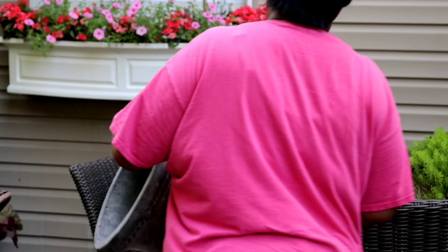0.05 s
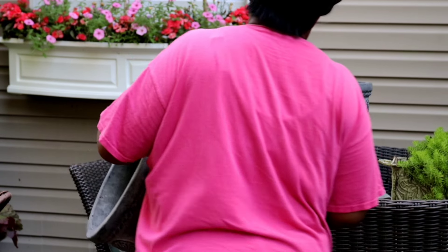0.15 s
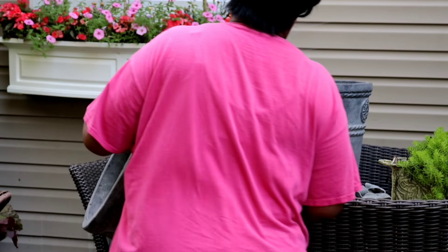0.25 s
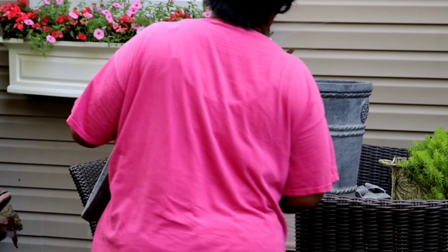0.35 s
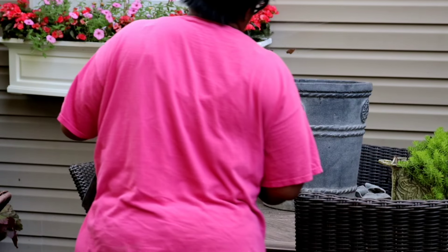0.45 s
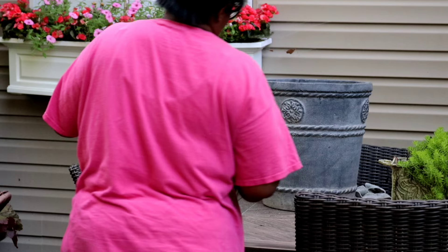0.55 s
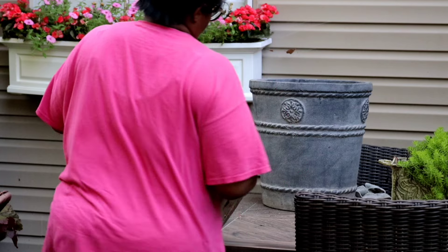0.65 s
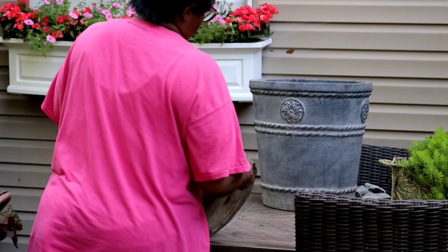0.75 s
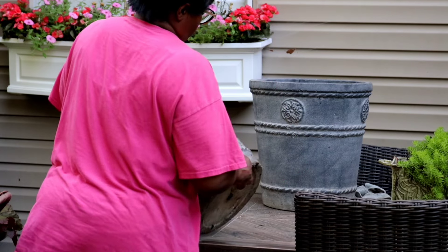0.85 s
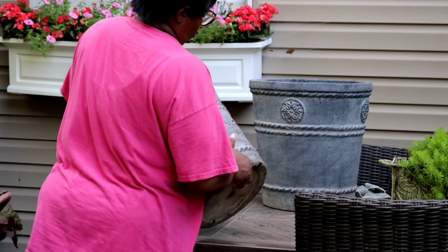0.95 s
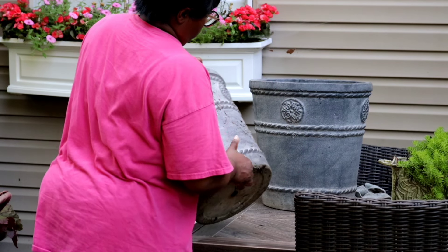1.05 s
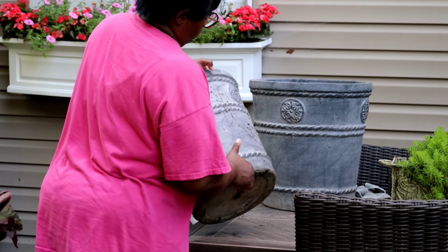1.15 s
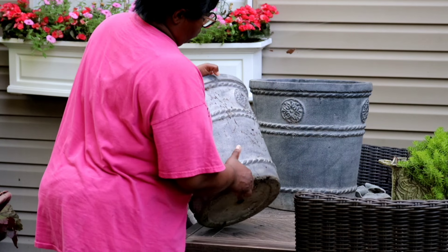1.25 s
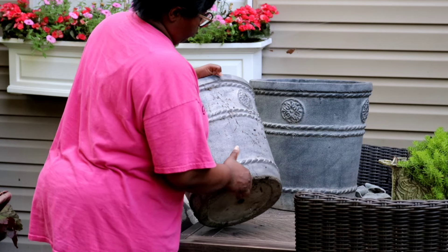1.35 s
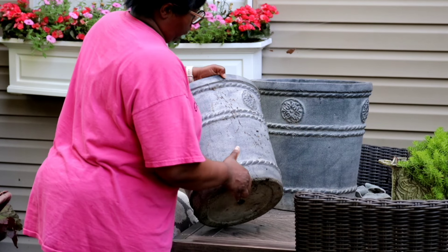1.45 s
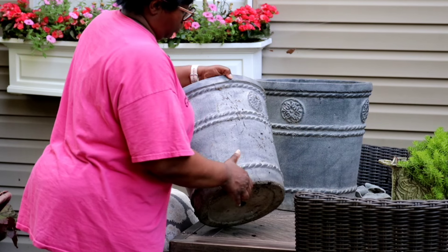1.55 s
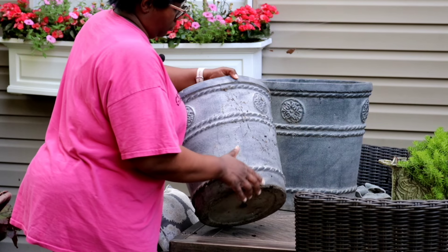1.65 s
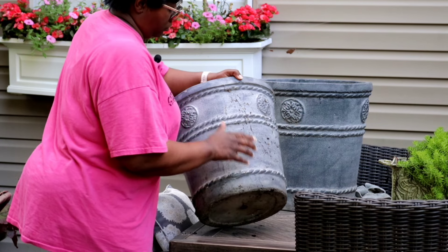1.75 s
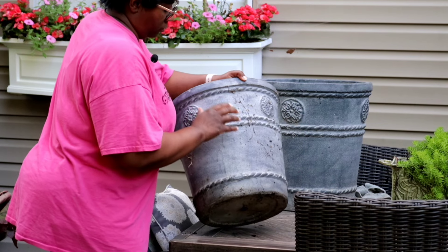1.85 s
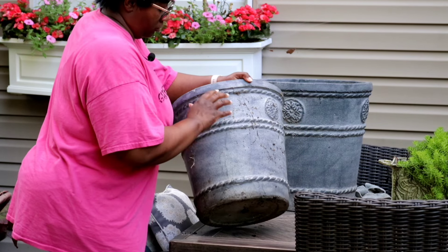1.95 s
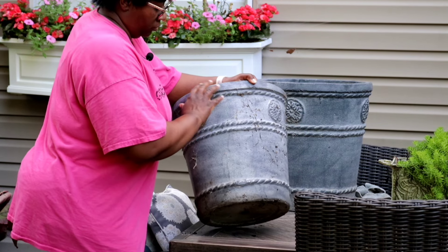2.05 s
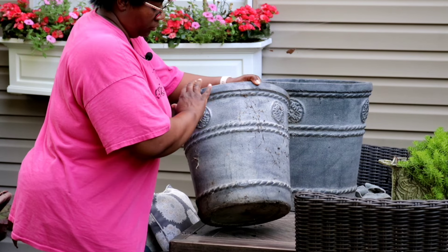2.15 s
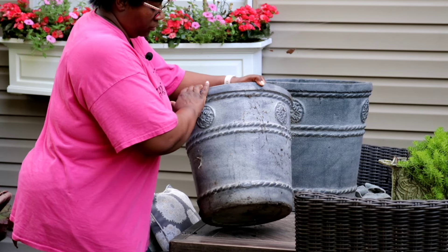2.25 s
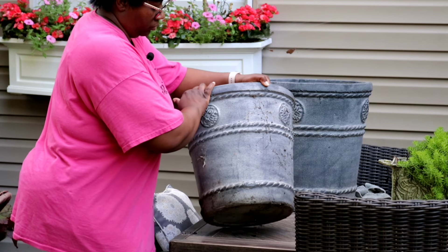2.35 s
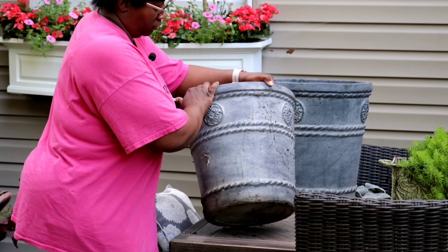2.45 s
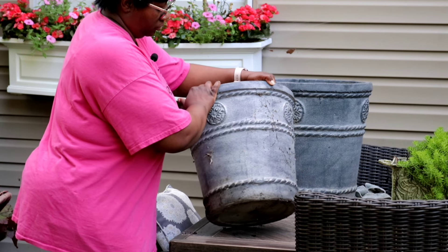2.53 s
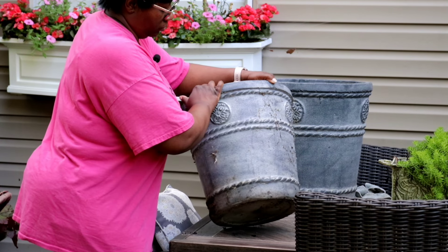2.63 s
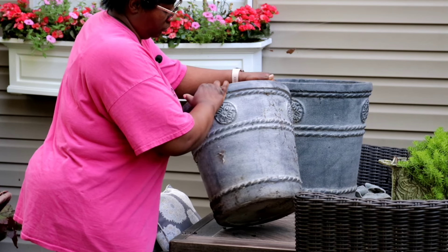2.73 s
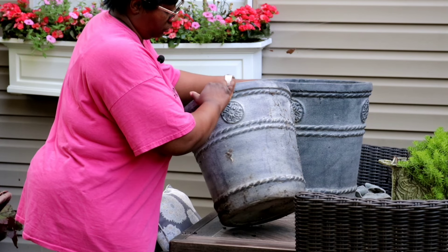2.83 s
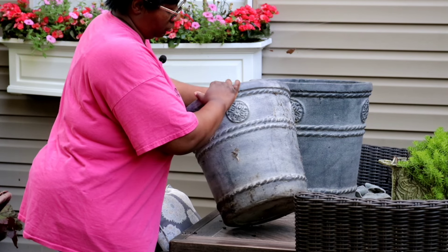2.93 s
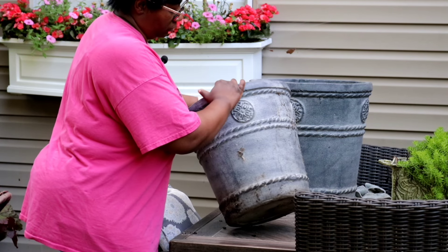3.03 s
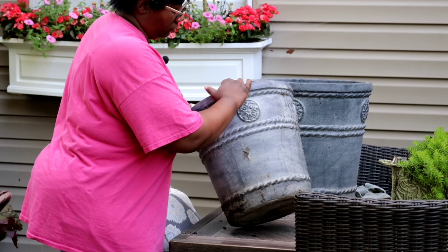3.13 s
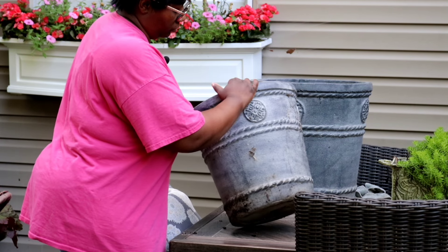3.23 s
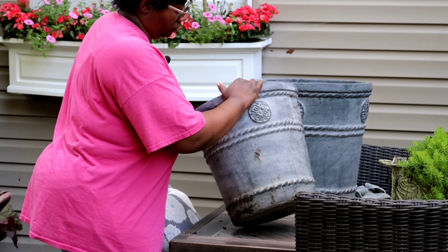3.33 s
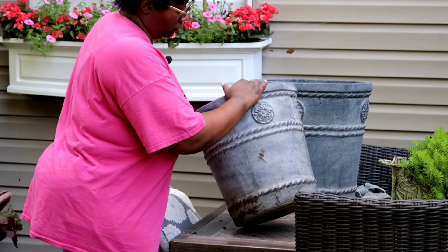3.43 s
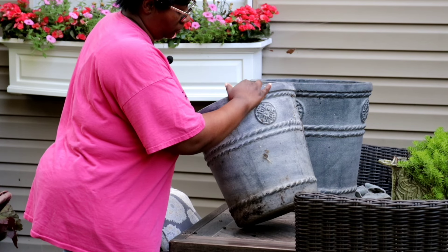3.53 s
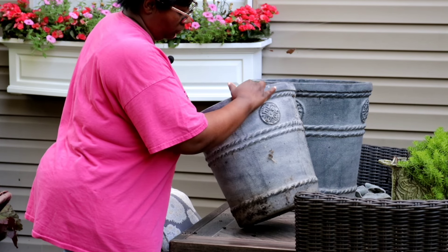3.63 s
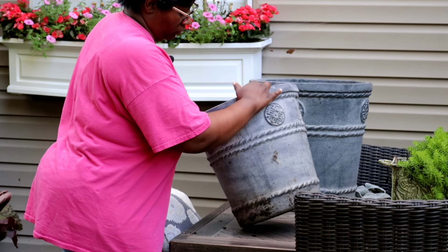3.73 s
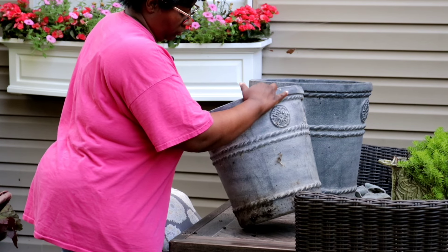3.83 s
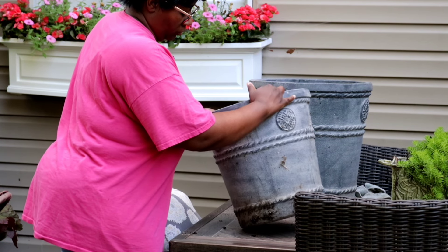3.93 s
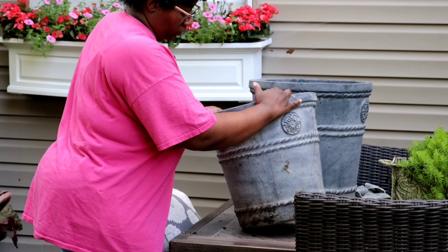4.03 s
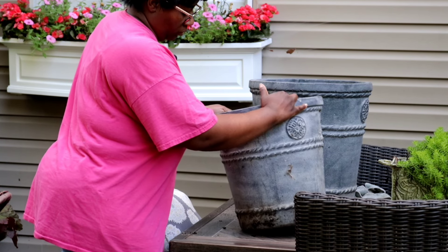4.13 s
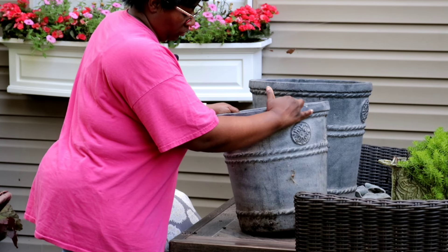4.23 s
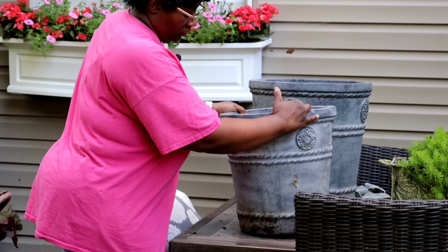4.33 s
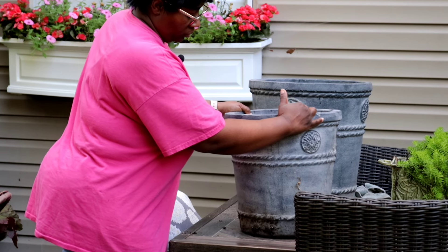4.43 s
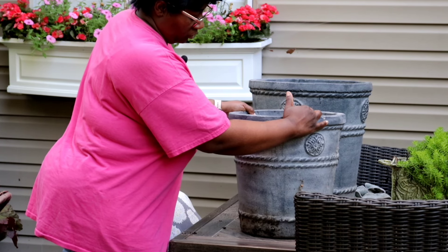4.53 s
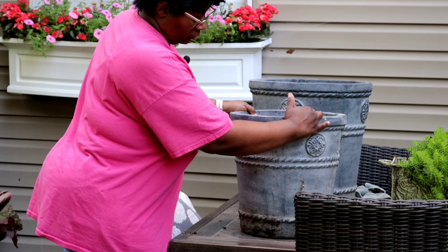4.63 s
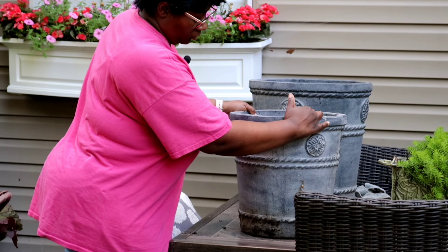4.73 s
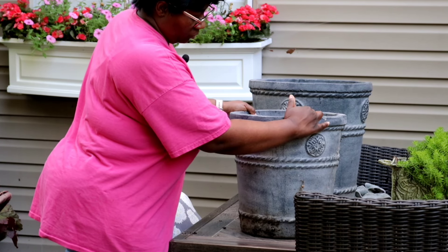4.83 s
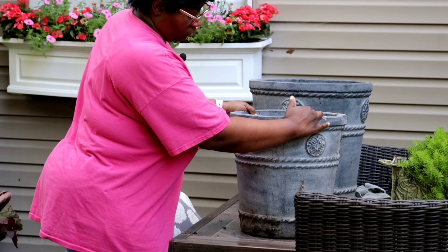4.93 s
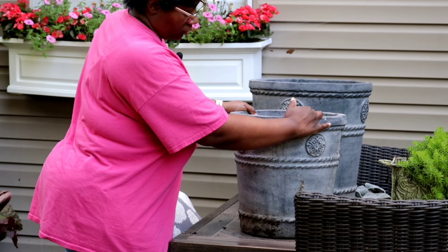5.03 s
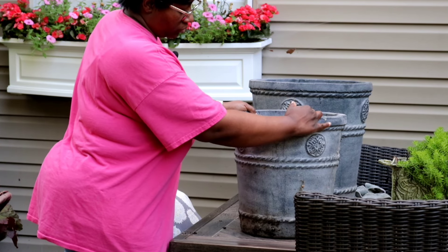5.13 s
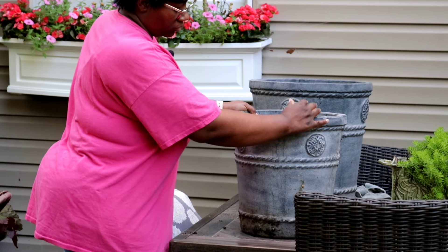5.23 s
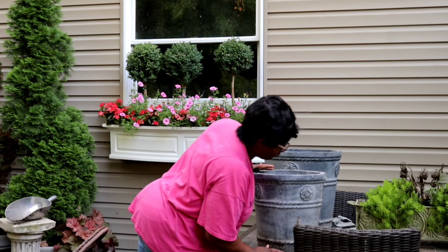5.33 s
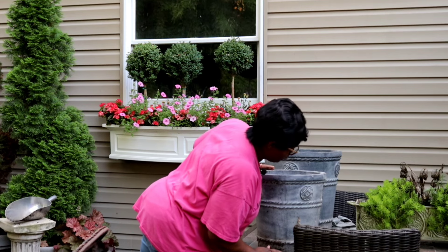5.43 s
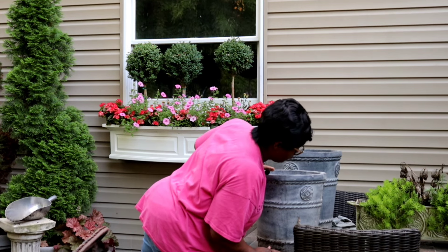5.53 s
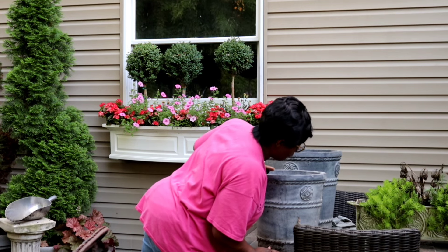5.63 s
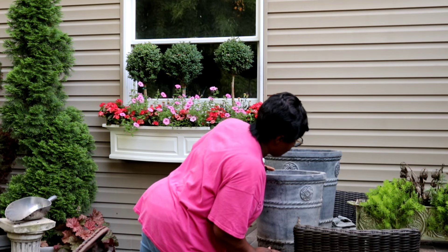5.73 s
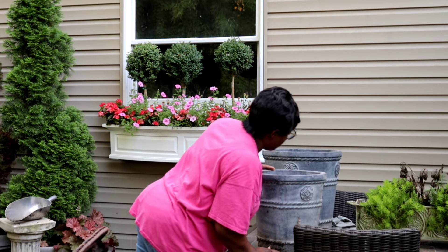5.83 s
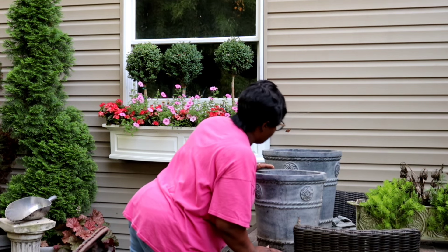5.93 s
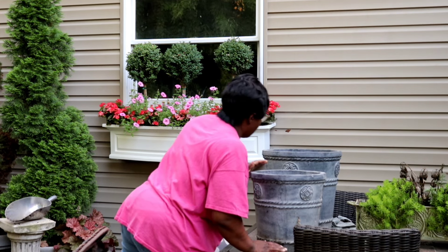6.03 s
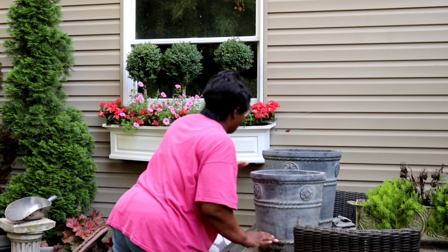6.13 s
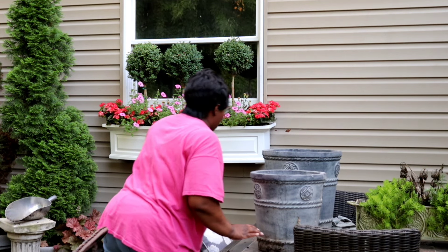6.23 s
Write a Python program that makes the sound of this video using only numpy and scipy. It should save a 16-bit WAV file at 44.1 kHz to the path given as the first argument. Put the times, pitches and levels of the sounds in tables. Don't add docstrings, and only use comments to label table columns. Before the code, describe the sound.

Outdoors beside a house, a clothing microphone catches rustling cloth, a brushing bump and a heavy double landing of a hollow pot on wood slats. Distant traffic rises behind it, with high insects, soft dove coos and later tiny bird chirps. Small gritty cracks, dull bumps and scrapes lead to a loud knocking clatter as the pot settles. A faint hand slide and two small bumps end it.

```python
import sys
import numpy as np
from scipy import signal
from scipy.fft import rfft, irfft, next_fast_len
from scipy.io import wavfile
from scipy.ndimage import uniform_filter1d, map_coordinates

SR = 44100
rng = np.random.default_rng(int(sys.argv[2]) if len(sys.argv) > 2 else 0)


def invert_db(x):
    u = np.asarray(x, float) / 20
    return 10 ** u


def pcm_store(signal):
    levels = np.round(np.clip(np.atleast_2d(signal), -1, 1) * 32767)
    wavfile.write(sys.argv[1], SR, levels.astype(np.int16).T)


N = 276982
TIME = np.arange(N) / SR

OPEN_S, OPEN_TAKES_S, CLAMP_S, CLAMP_TAKES_S = 1.48, 0.066, 5.46, 0.096


def unit(x):
    return x / np.sqrt(np.mean(x ** 2) + 1e-20)


def curves(rows):
    s, *columns = np.transpose(rows)
    return [np.interp(TIME, s, column) for column in columns]


def wobble(rate):
    knots = rng.standard_normal(int(N * rate / SR) + 4)
    return map_coordinates(knots, [TIME * rate])


def filtered(x, response):
    m = next_fast_len(len(x) + SR // 2)
    return irfft(rfft(x, m) * response(np.fft.rfftfreq(m, 1 / SR)), m)[:len(x)]


def resonant(x, modes):
    def response(f):
        total = 0
        for k, (centre, width, db) in enumerate(modes):
            damping = 1j * f * width
            total = total + (-1) ** k * invert_db(db) * damping / (centre * centre - f * f + damping)
        return total
    return filtered(x, response)


def rush(spectrum, patchy_db):
    z = signal.stft(rng.standard_normal(N + 512), nperseg=512)[2]
    field = uniform_filter1d(rng.standard_normal(z.shape), 6, 0)
    field = uniform_filter1d(field, 8, 1)
    noise = signal.istft(z * invert_db(patchy_db * unit(field)), nperseg=512)[1][:N]
    f, db = np.transpose(spectrum)
    return unit(filtered(noise, lambda hz: invert_db(np.interp(np.log(hz + 1), np.log(f + 1), db))))


def fading(start, t60, rise):
    t = np.maximum(TIME - start, 0)
    return (1 - np.exp(-t / rise)) * invert_db(-60 * t / t60)


def held(start, hold, rise, t60):
    return fading(start, 1e3, rise) * invert_db(-60 * np.maximum(TIME - start - hold, 0) / t60)


def gated(muted_db, open_db, clamped_db):
    corners = [OPEN_S, OPEN_S + OPEN_TAKES_S, CLAMP_S, CLAMP_S + CLAMP_TAKES_S]
    return np.interp(TIME, corners, [muted_db, open_db, open_db, clamped_db])


# frequency in Hz, density in dB per Hz.
RUMBLE_SPECTRUM = [(12, -49.5), (20, 7), (75, -3), (118, 4.5), (206, -5), (236, -15.5), (300, -13),
                   (390, -47.5), (660, -120)]
HUM_SPECTRUM = [(120, -30.5), (200, -7.5), (237, -8.5), (367, -1.5), (501, -5.5), (936, -7), (1500, -24.5),
                (1950, -55), (3300, -120)]
AIR_SPECTRUM = [(710, -39), (1200, -3.5), (1520, -6.5), (1720, -8), (2570, -11.5), (4200, -23.5),
                (5460, -53), (9240, -120)]
# time in seconds, level in dB.
TRAFFIC_SWELL = [(0, 0.5), (.77, -0.5), (1.21, 11.5), (1.45, 3.5), (1.6, 1), (1.99, 2), (2.4, 0.5),
                 (2.76, 0), (3.11, 1.5), (3.55, -1.5), (4.06, 1), (4.56, 0), (4.95, -2.5), (5.35, 0),
                 (5.6, -1), (6.28, -2)]
# start in seconds, extra level in dB.
FILTER_LEAKS = [
    (1.53, 6.3),
    (4.72, 24),
]


def yard():
    swell_db = curves(TRAFFIC_SWELL)[0]
    swell_db = swell_db + sum(db * fading(s, t60=0.34, rise=.01) for s, db in FILTER_LEAKS)
    rumble_db = gated(-74.5, -47.5, -60) + .9 * swell_db + 1.2 * wobble(12.0)
    hum_db = gated(-77, -49.5, -61.5) + swell_db
    air_db = gated(-80, -59.5, -75.5) + 0.54 * swell_db
    return (invert_db(rumble_db) * rush(RUMBLE_SPECTRUM, patchy_db=-0.5)
            + invert_db(hum_db) * rush(HUM_SPECTRUM, patchy_db=0.5)
            + invert_db(air_db) * rush(AIR_SPECTRUM, patchy_db=2.0))


# time in seconds, level in dB.
CHORUS_LEVEL = [(0, -49), (.37, -47), (.68, -51), (.86, -35), (1.05, -46.5), (1.4, -44), (1.57, -59),
                (2.15, -57), (3.17, -59.5), (4.5, -60), (4.67, -57), (4.98, -60.5), (5.25, -56.5),
                (5.49, -61.5), (5.6, -75.5), (6.28, -76)]


def insects():
    high_db = curves(CHORUS_LEVEL)[0]
    low_db = high_db + gated(-12.5, -9.5, -8) + 1.6 * wobble(4)
    out = 0
    # level, centre in Hz, width in Hz, strokes a second
    for db, hz, width, rate in [(high_db, 8400, 340, 59), (low_db, 7230, 280, 80)]:
        strokes = np.sin(2 * np.pi * rate * TIME + 1.0 * wobble(3.8))
        throb = invert_db(1.7 * strokes + 1.4 * wobble(24.97))
        band = resonant(rng.standard_normal(N), [(hz, width, 0)])
        out = out + invert_db(db) * unit(throb * resonant(band, [(hz, width, 0)]))
    return out


def coo(s, length, hz, db):
    scoop, sag, rise_s = .04, 0.0317, .03
    u = np.clip((TIME - s) / length, 0, 1)
    pitch = hz * (1 - scoop * np.exp(-u * length / rise_s) - sag * u ** 2)
    edge = np.clip(np.minimum(u, 1 - u) * length / rise_s, 0, 1)
    level_db = db + 1.0 - 2.2 * u + 0.59 * wobble(30.2)
    return edge * invert_db(level_db) * np.sin(2 * np.pi * np.cumsum(pitch) / SR)


# start in seconds, length in seconds, top pitch in Hz, level in dB.
DOVE_COOS = [
    (.7, .1, 508, -71),
    (1.81, .28, 524, -45.5),
    (2.63, .39, 517, -49),
]
# centre in seconds, level in dB.
BIRD_CHIRPS = [
    (4.02, -55.5),
    (4.11, -54.5),
    (4.2, -56),
]


def birds():
    out = sum(coo(*row) for row in DOVE_COOS)
    for s, db in BIRD_CHIRPS:
        t = TIME - s
        phase = 2 * np.pi * (2280 * t - 600 * t ** 2) + 1.2 * wobble(250)
        out += invert_db(db) * np.exp(-(t / 0.013) ** 2) * (np.sin(phase) + 0.6 * np.sin(2 * phase))
    return out


# frequency in Hz, density in dB per Hz.
COARSE_RUB = [(1500, -120), (2200, -19), (3200, -17.5), (4300, -5), (5000, -1.5), (6000, -2), (7000, -3),
              (8000, -120)]
MIDDLE_RUB = [(4500, -120), (5500, -16), (7000, 0.5), (8000, 3.5), (9500, -2), (11000, -12), (13000, -34),
              (14000, -120)]
FINE_RUB = [(8000, -120), (9000, -15.5), (10500, 2), (11800, 1), (13000, -2.5), (14500, -11), (15600, -22),
            (15800, -120)]
WEAVE_RUB = [(3000, -120), (3500, -11.5), (4300, -1.5), (5000, 1.5), (5500, -2.5), (6200, -7), (8000, -120)]
# start in seconds, hold in seconds, level in dB, fine over coarse in dB.
SHIRT_SWISHES = [
    (.005, 0.0087, -61, 0),
    (.18, .02, -63, 11),
    (0.28, 0.035, -55, 4.5),
    (0.49, 0.024, -62, -6),
    (0.643, 0.014, -51, 3),
    (.715, .03, -62.5, -4),
    (.775, .03, -67.5, 7),
    (0.965, 0.049, -52.5, 3),
    (1.082, 0.055, -53.5, 7),
    (1.27, 0.045, -57, 3),
]
# start in seconds, hold in seconds, level in dB, fine over coarse in dB.
SLEEVE_FIDGETS = [
    (1.7, 0.54, -66, -14),
    (2.38, .06, -72, 8),
    (3.35, 0.14, -66, -4.5),
    (3.9, 0.8, -72, -21),
]


def cloth():
    rise_s, swish_t60, lean_s = 0.0073, .25, .86
    flurry = invert_db(0.45 * wobble(40) + 1.5 * wobble(300))
    leaning = (TIME > lean_s) & (TIME < OPEN_S)
    swish, silky = sum(invert_db([[db], [db + fine_db]]) * held(s, hold, rise_s, swish_t60)
                       for s, hold, db, fine_db in SHIRT_SWISHES)
    fidget, sheen = sum(invert_db([[db], [db + fine_db]]) * held(s, hold, rise=.05, t60=.6)
                        for s, hold, db, fine_db in SLEEVE_FIDGETS)
    settling = invert_db(-46) * held(lean_s, 0.072, rise_s, swish_t60)
    coarse = np.hypot(invert_db(gated(-62.5, -70.5, -91) + 0.5 * leaning), swish + fidget)
    middle = np.hypot(invert_db(gated(-51, -65, -85.5)), invert_db(4.5) * swish * ~leaning + settling)
    fine = np.hypot(invert_db(gated(-61, -74, -94) - 18 * leaning), silky + sheen)
    sleeve = np.exp(-((TIME - 2.89) / .055) ** 2)
    landed = TIME >= OPEN_S + OPEN_TAKES_S
    tone = np.where(landed, rush(WEAVE_RUB, patchy_db=1.5), rush(COARSE_RUB, patchy_db=-0.5))
    return flurry * ((coarse + invert_db(-58.5) * sleeve) * tone
                     + middle * rush(MIDDLE_RUB, patchy_db=-1.5)
                     + (fine + invert_db(-59.5) * sleeve) * rush(FINE_RUB, patchy_db=0))


# frequency in Hz, density in dB per Hz.
DULL_BRUSH = [(700, -120), (1000, -17), (2000, -7.5), (3500, -1.5), (4500, -120)]
SHARP_BRUSH = [(2800, -120), (3500, -1.5), (5500, 1), (7500, 4), (10000, -8), (13000, -16), (15800, -41)]
# start in seconds, dull level in dB, dull t60 in seconds,
# sharp level in dB, sharp t60 in seconds, plateau in seconds.
SHIRT_BRUSHES = [
    (0.8258, -41, 0.11, -30, 0.14, 0.0094),
    (1.408, -33, 0.14, -23, 0.12, 0.017),
    (1.504, -45.5, 0.22, -63, 0.1, 0.011),
]


def brushes():
    dull, sharp = rush(DULL_BRUSH, patchy_db=-1.0), rush(SHARP_BRUSH, patchy_db=3)
    out = 0
    for s, dull_db, dull_t60, sharp_db, sharp_t60, plateau in SHIRT_BRUSHES:
        out = out + invert_db(dull_db) * held(s, plateau, .003, dull_t60) * dull
        out = out + invert_db(sharp_db) * held(s, plateau, .003, sharp_t60) * sharp
    return out


# frequency in Hz, density in dB per Hz.
PALM_SPECTRUM = [(700, -120), (1000, 0.5), (1800, 5.5), (2100, -3), (3000, -14), (3800, -7), (5000, -15),
                 (6000, -120)]


def slide():
    return invert_db(-65.5) * held(5.76, hold=0.4, rise=0.051, t60=1.0) * rush(PALM_SPECTRUM, patchy_db=1.5)


def pat():
    start, length_s, hz = 3.616, .03, 203
    swell = np.sin(np.pi * np.clip((TIME - start) / length_s, 0, 1)) ** 0.85
    return invert_db(-27.5) * swell * np.sin(2 * np.pi * hz * (TIME - start))


# frequency in Hz, width in Hz, level in dB.
FOOT_MODES = [(1220, 60, -4), (2230, 90, -4), (2820, 130, 0), (3560, 80, -6), (3780, 120, -1)]
# frequency in Hz, density in dB per Hz.
SNAP_SPECTRUM = [(1000, -17.5), (2500, -1.5), (5000, -1.5), (8000, -3.5), (12000, -3), (16000, -22)]
# start in seconds, hold in seconds, level in dB.
BASE_DRAGS = [
    (3.11, .028, -56),
    (3.171, .14, -53),
    (4.335, 0.093, -56),
    (4.586, 0.086, -46),
    (4.697, .03, -46),
]


def drags():
    stroke = sum(invert_db(db) * held(s, hold, rise=.003, t60=0.13) for s, hold, db in BASE_DRAGS)
    slips = stroke * unit(invert_db(2 * wobble(110) + 4 * wobble(700)))
    ringing = invert_db(12.5) * resonant(slips * rng.standard_normal(N), FOOT_MODES)
    return ringing + invert_db(-10.0) * slips * rush(SNAP_SPECTRUM, patchy_db=-0.5)


# frequency in Hz, width in Hz, level in dB.
WALL_MODES = [(540, 200, -8), (800, 250, -8), (1150, 250, -7), (1790, 220, -3), (2350, 200, -3.5)]
RIM_MODES = [(2900, 260, 0), (3790, 130, -7), (3990, 90, -4), (4500, 500, -10), (6200, 1500, -18)]
# start in seconds, peak in dB, bright part in dB.
SLAT_KNOCKS = [(1.5021, -16, -27), (1.511, -20, -28), (4.5832, -22, -34), (4.5951, -17.5, -23),
               (4.6093, -9, -20), (4.617, -13, -22), (4.626, -20.5, -17.5), (4.6325, -23.5, -25),
               (4.6428, -20.5, -17.5), (4.6545, -18.5, -20), (4.6625, -22, -19.5), (4.699, -10, -16),
               (4.7074, -12.5, -20), (4.7174, -6.5, -19), (4.726, -16.5, -20), (4.752, -28, -8),
               (4.763, -11, -18.5), (5.2447, -28.5, -16.5), (5.258, -41, -5), (5.2938, -18.5, -13)]
# start in seconds, peak in dB, bright part in dB.
GRIT_CRACKS = [(1.75, -64.5, 13), (2.0074, -42, -12.5), (2.1143, -42.5, -6), (2.2913, -43.5, -24),
               (2.425, -39, -15.5), (2.5649, -33.5, -15), (2.5753, -29.5, -36), (3.1188, -32, -16),
               (3.1363, -31, -20), (3.178, -39.5, -17), (3.209, -33, -28), (3.2278, -35, -16),
               (3.2607, -36, -30), (3.287, -40, -10), (3.3144, -51, -23), (4.333, -40.5, -17),
               (4.38, -32.5, -19), (5.1494, -55, -4.5), (5.38, -49, -7), (6.0142, -47.5, -9),
               (6.1674, -42.5, -8.5)]


def ticks():
    hits = [(*k, -6.5, 0.023) for k in SLAT_KNOCKS] + [(*c, -15, 0.038) for c in GRIT_CRACKS]

    def chatter(s, t60):
        return fading(s, t60, rise=0.00038) + fading(s, t60=0.0025, rise=0.00018)

    wall = sum(invert_db(db) * chatter(s, t60) for s, db, _, _, t60 in hits)
    rim = sum(invert_db(db + rim_db) * chatter(s, t60) for s, db, _, rim_db, t60 in hits)
    snap = sum(invert_db(db + bright_db) * chatter(s, 1.9 * t60) for s, db, bright_db, _, t60 in hits)
    foot = sum(invert_db(db) * fading(s, t60=0.014, rise=.0004) for s, db, _ in GRIT_CRACKS)
    wall_grit, rim_grit = rng.standard_normal((2, N)) * invert_db(1.5 * wobble(600))
    return (invert_db(6) * resonant(wall * wall_grit, WALL_MODES)
            + invert_db(10.5) * resonant(rim * rim_grit, RIM_MODES)
            + invert_db(9) * resonant(foot * rim_grit, FOOT_MODES)
            + invert_db(0.5) * snap * rush(SNAP_SPECTRUM, patchy_db=7.0))


# start in seconds, frequency in Hz, level in dB, t60 in seconds.
LOW_BOOMS = [(.84, 86, -31, .25), (1.424, 142, -24, .2), (1.503, 146, -13, .14), (1.51, 55, -26, .25),
             (2.585, 200, -38, .15), (2.904, 75, -32, .15), (2.935, 48, -30, .2), (2.94, 200, -40, .15),
             (3.143, 192, -35, .15), (3.23, 200, -40, .2), (4.72, 200, -30, .2)]


def booms():
    out = 0
    for s, hz, db, t60 in LOW_BOOMS:
        phase = 2 * np.pi * hz * (TIME - s) + 0.12 * wobble(30)
        out = out + invert_db(db) * fading(s, t60, rise=0.0015) * np.sin(phase)
    return out


# frequency in Hz, width in Hz, level in dB.
BODY_MODES = [(60, 40, 0), (146, 45, -2), (212, 55, -4), (303, 70, -4.5), (412, 80, -5), (528, 85, -4),
              (641, 95, -7), (800, 220, -10.5), (1400, 900, -18)]
# start in seconds, peak in dB, contact in milliseconds, rattle t60 in seconds.
BASE_BUMPS = [(0.823, -23.5, 1.03, 0.12), (0.841, -23.5, 0.34, 0.15), (0.865, -33, 0.27, 0.25),
              (1.19, -45.5, 3.1, 0.14), (1.409, -14, 1.25, 0.046), (1.423, -9, 0.92, 0.16),
              (1.436, -20, 0.49, 0.51), (1.454, -28, 0.2, 0.24), (1.502, -23, 1.4, 0.091),
              (1.505, -5, 0.45, 0.019), (1.51, -17, 0.94, 0.22), (1.517, -8.5, 0.48, 0.15),
              (1.527, -17, 0.67, 0.13), (1.553, -19, 2.13, 0.14), (2.578, -32.5, 0.23, 0.22),
              (2.903, -28, 3.2, 0.08), (2.934, -26, 3.15, 0.3), (3.144, -32.5, 0.55, 0.6),
              (3.236, -32, 0.77, 0.8), (4.61, -30.5, 1.8, 0.51), (4.718, -15, 0.3, 0.22),
              (4.744, -21, 0.36, 0.056), (5.296, -28.5, 0.24, 0.083), (6.012, -43, 0.53, 0.18),
              (6.166, -44.5, 0.96, 0.1)]


def bumps():
    force = np.zeros(N + SR)
    t = np.arange(SR // 3) / SR
    for s, db, contact_ms, t60 in BASE_BUMPS:
        push = signal.windows.hann(max(int(contact_ms * SR / 1000), 3) + 2)
        jolts = 0.043 * rng.standard_normal(len(t)) * invert_db(-60 * t / t60)
        jolts[0] -= 1
        blow = signal.fftconvolve(jolts, push / push.sum())[:len(t)]
        force[round(s * SR):][:len(t)] += invert_db(db + 36.5) * blow
    return resonant(force[:N], BODY_MODES)


def porch(x):
    t = np.arange(SR // 3) / SR
    tail = signal.lfilter([1], [1, -.6], rng.standard_normal(len(t)))
    tail = tail * invert_db(-60 * t / 0.076) * (t > .004)
    return signal.fftconvolve(x, tail / np.linalg.norm(tail))[:N]


def scene():
    pot = bumps() + booms() + ticks() + drags()
    pot = pot + invert_db(-9.5) * porch(pot)
    return (pot + pat() + slide() + brushes() + cloth() + birds() + insects() + yard())[None]


def low_pass(x):
    return signal.sosfilt(signal.butter(12, 16500, fs=SR, output="sos"), x)


def record(dry):
    hiss_db = -72 - 5 * (TIME > 5.548)
    hiss_spectrum = [(2000, -120), (3000, -1.0), (15600, -3.5), (15800, -120)]  # Hz, dB per Hz
    hiss = invert_db(hiss_db) * rush(hiss_spectrum, patchy_db=1.0)
    mix = filtered(dry[0] + hiss, lambda hz: (1j * hz / (36 + 1j * hz)) ** 2 * (hz < 16400))
    return low_pass(mix)


dry = scene()
out = record(dry)
pcm_store(out)
```